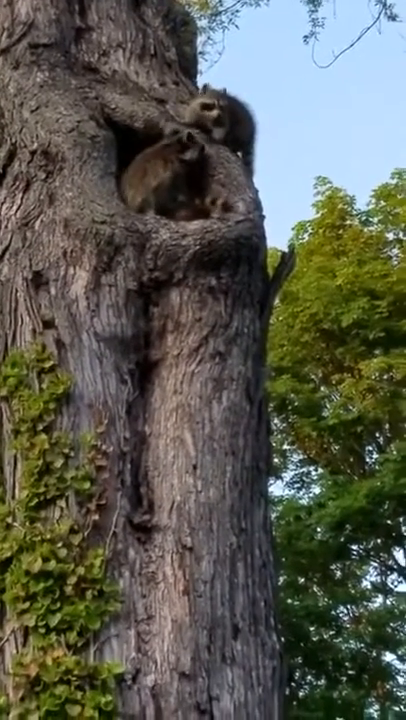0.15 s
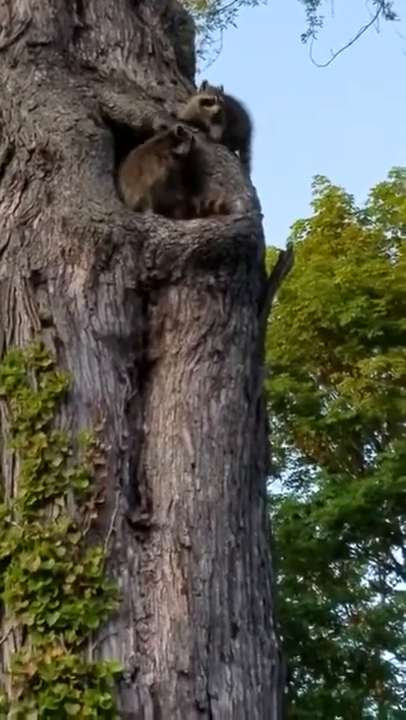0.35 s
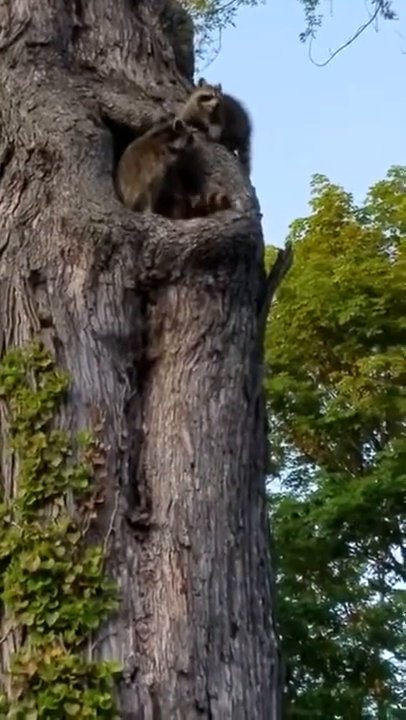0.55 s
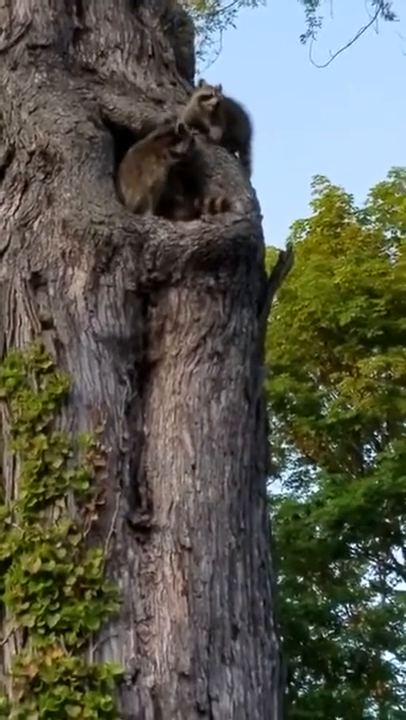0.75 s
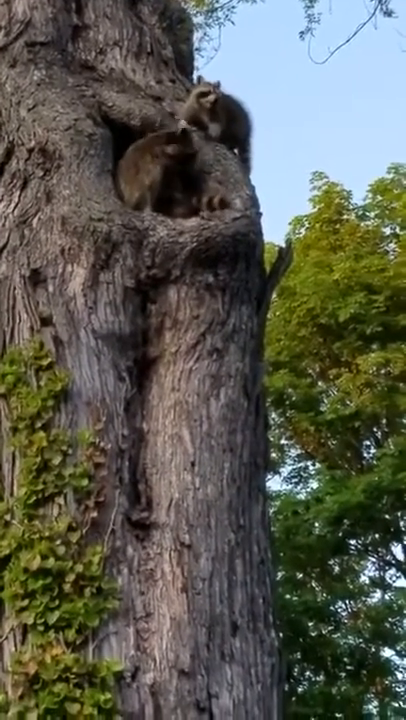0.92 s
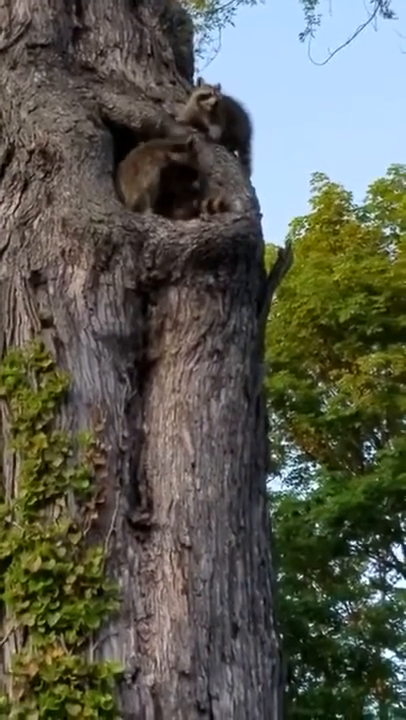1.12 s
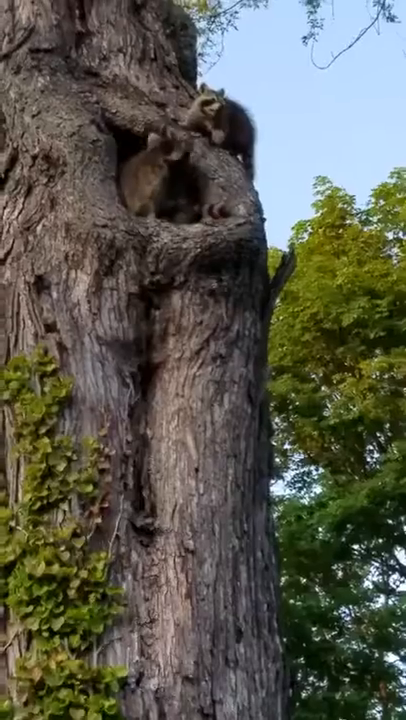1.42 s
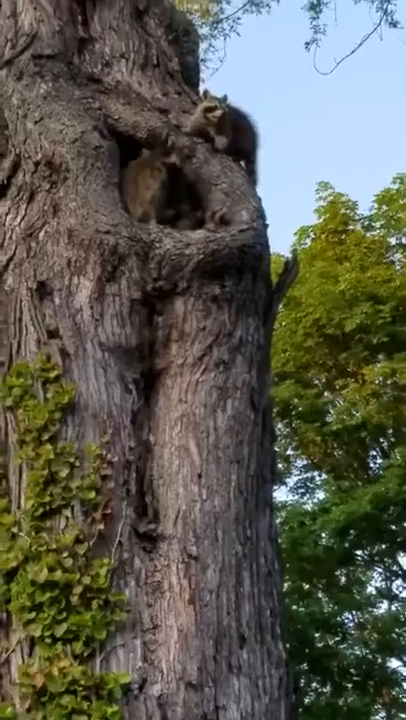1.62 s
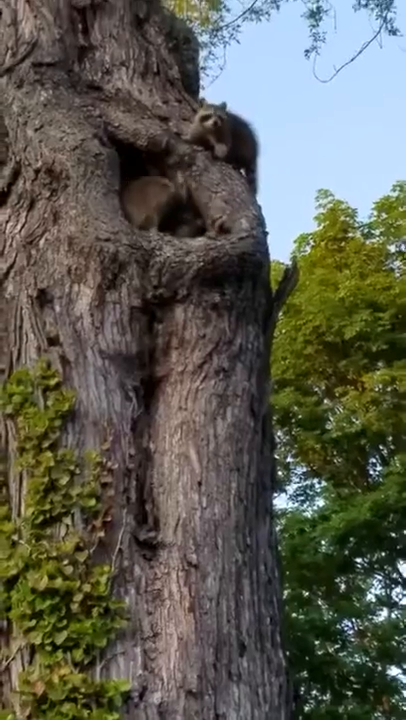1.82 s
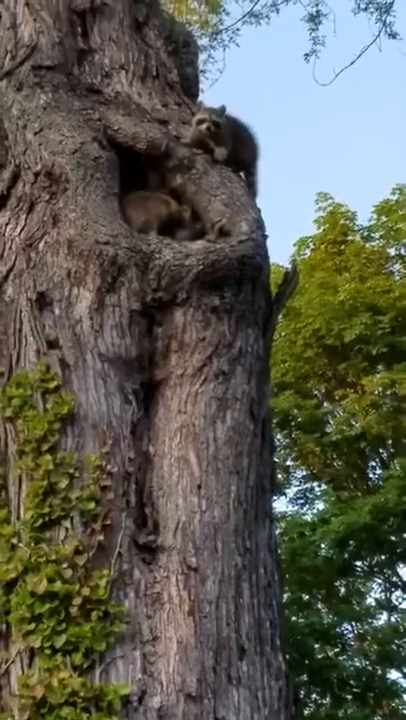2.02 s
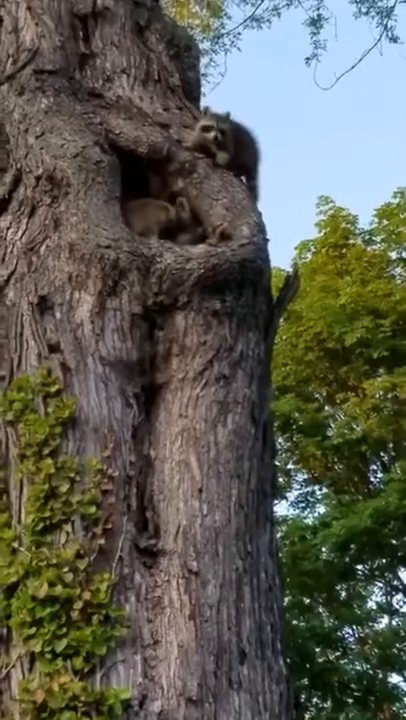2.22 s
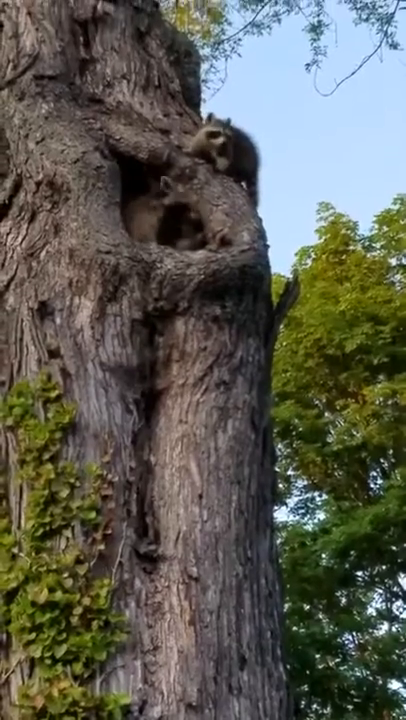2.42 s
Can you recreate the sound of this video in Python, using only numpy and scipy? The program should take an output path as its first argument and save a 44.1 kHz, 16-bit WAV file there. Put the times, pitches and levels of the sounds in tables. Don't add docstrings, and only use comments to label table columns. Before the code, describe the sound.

A rapid raccoon trill, shrill then hoarse, rings through open woods before quiet leaf rustle and traffic hum

```python
import sys
import numpy as np
from scipy import signal
from scipy.fft import rfft, irfft, next_fast_len
from scipy.io import wavfile
from scipy.ndimage import uniform_filter1d

SR = 44100
rng = np.random.default_rng(int(sys.argv[2]) if len(sys.argv) > 2 else 0)


def dump(signal):
    limited = np.clip(np.atleast_2d(signal).T, -1, 1)
    pcm = np.round(limited * 32767).astype(np.int16)
    wavfile.write(sys.argv[1], SR, pcm)


def boost_factor(decibels):
    exponent = np.asarray(decibels, float) / 20
    return 10 ** exponent


N = 112454
PADDED = next_fast_len(N)
FREQ = np.fft.rfftfreq(PADDED, 1 / SR)

# (frequency [Hz], density [dB per Hz])
TRAFFIC_COLOUR = [(15, -60), (25, -49), (59, -8), (204, -2), (552, -10.5), (919, -8.5), (1450, -14.5),
                  (3830, -31), (15500, -61.5)]
# (frequency [Hz], side against mid [dB])
TRAFFIC_SIDE = [(60, -17), (110, -29), (200, -15.5), (380, -9.5), (700, -8), (1290, -2.5), (2380, -0.5),
                (4400, -16), (8120, -1), (15000, 7)]
# (time [s], level [dB])
TRAFFIC_SWELL = [(0, 0), (.7, 1), (1.3, 1), (1.9, -0.5), (2.55, -0.5)]
# (frequency [Hz], width [Hz], level [dB])
ENGINE_HUM = [(184, 146, 0)]
# (time [s], length [s], level [dB])
GUSTS = [
    (0.173, 0.022, 9.5),
    (1.81, 0.016, 6.5),
    (2.04, 0.087, 4.5),
    (2.313, 0.059, 4.5),
    (2.54, 0.019, 0.5),
]
# (time [s], length [s], level [dB], pitch [Hz])
BIRD_CALLS = [
    (1.96, .14, -59, 3750),
    (2.27, .09, -66, 3930),
    (2.53, .03, -60, 3800),
]
# (time [s], level [dB], frequency [Hz], length [s])
BUMPS = [
    (0.164, -37.5, 130, 0.066),
    (1.218, -37.5, 128, .045),
    (1.507, -43, 199.6, 0.026),
    (1.76, -45.5, 196.7, 0.038),
    (1.772, -47, 460, 0.027),
    (1.792, -44, 1740, 0.012),
    (1.72, -46, 140, 0.093),
    (2.01, -54, 1670, .02),
    (2.21, -41, 197, 0.015),
    (2.395, -45, 188, 0.021),
]
# (time [s], level [dB])
FINGER_TICKS = [
    (1.762, -43),
    (1.777, -33),
    (1.787, -43),
    (1.796, -38),
]
# (frequency [Hz], width [Hz], depth [0-1, negative rings])
WOODS_RING = [(1600, 300, .8), (2450, 900, -.5), (3080, 300, .7)]
# (frequency [Hz], level [dB])
WOODS_LEFT = [(1000, -2.5), (1600, -5.5), (2500, -2), (4000, 5.5), (8000, -2), (15000, 1.5)]
# (time of peak [s], level [dB], pitch [Hz])
HIGH_PULSES = [(.219, -41.5, 1440), (.258, -29, 1693), (.305, -23, 1759), (.358, -22.5, 1773),
               (.412, -23, 1757), (.46, -23, 1760), (.508, -19.5, 1793), (.551, -20.5, 1835),
               (.591, -18, 1850), (.648, -22.5, 1897), (.684, -20, 1921), (.733, -22, 1927),
               (.779, -22.5, 1930), (.833, -23.5, 1940), (.887, -22.5, 1980), (.934, -21.5, 1981),
               (.976, -23, 1989), (1.017, -20.5, 1983), (1.075, -26, 1960), (1.108, -24.5, 1958),
               (1.158, -32, 1862), (1.234, -26, 1958), (1.312, -29, 1991), (1.397, -32.5, 1874)]
# (time of peak [s], level [dB], pitch [Hz])
LOW_PULSES = [(.492, -34.5, 1570), (.538, -42, 1570), (.585, -43, 1580), (.63, -30, 1580),
              (.677, -27.5, 1590), (.728, -26, 1610), (.767, -28.5, 1570), (.811, -21.5, 1550),
              (.868, -20, 1605), (.912, -26, 1615), (.957, -32.5, 1590), (1.003, -38, 1600),
              (1.045, -24, 1590), (1.095, -31, 1590), (1.15, -25.5, 1570), (1.184, -25.5, 1580),
              (1.23, -30.5, 1570), (1.29, -27, 1545), (1.339, -32, 1555), (1.368, -30, 1547),
              (1.392, -26, 1626)]
HIGH_ORDERS_DB = [0.5, 0.5, -14, -12, -39, -25, -36, -21]
LOW_ORDERS_DB = [-2, -1.5, -5.5, -6, -10, -42, -17.5, -32]
# (time [s], share that the pitch starts low [0-1])
HIGH_SCOOP = [(0.249, .1), (0.499, 0.079), (.7, .035), (1.1, 0.02396)]
LOW_SCOOP = [(.5, .03), (1.3, .025), (1.389, 0.0518)]
# (time [s], first harmonic against the rest [dB])
HIGH_CHEST = [(.22, 8), (.3, 0.5), (.45, -4), (.6, -7), (.8, -3.5), (.93, 3.5), (1.1, -2.5), (1.25, -11),
              (1.32, -3)]
LOW_CHEST = [(.5, 3.5), (.9, -1.5), (1.3, -0.5), (1.39, 3)]
# (time [s], level [dB])
LATE_ONSET = [(.3, -0.5), (.6, -1), (.95, -7), (1.2, -5.5)]
# (time [s], level against the tone [dB], steady share [0-1])
RASP = [(.19, 2.5, 0), (0.299, -7, 0.3), (.5, -10.5, 0.5), (.7, -3.5, 0.96), (.9, -3.5, 1),
        (1.1, 0.5, 0.93), (1.3, 3.5, 1), (1.4, 3.5, 1)]
# (frequency [Hz], level [dB])
THROAT = [(1150, -18.5), (1450, -0.5), (2400, -2.5), (3300, 0.5), (4600, -6.5), (6500, -4.5),
          (10000, -13.5), (15000, -19)]
# (frequency [Hz], width [Hz], depth [0-1, negative
HOLLOW = [(12350, 1300, 0.65), (1610, 124, -2.18), (3046, 176, -1.37)]
# (frequency [Hz], width [Hz], depth [0-1, negative rings])
DIPS_EARLY = [(4160, 1500, 1), (8030, 1300, 0.79), (10000, 1270, 0.83)]
DIPS_MIDDLE = [(4492, 960, 0.99), (8850, 460, 1)]
DIPS_LATE = [(4810, 590, 0.74), (8750, 270, 0.65), (2520, 380, -0.55), (4220, 160, -0.17)]
# (frequency [Hz], level [dB])
LEFT_PORT = [(1000, -1), (1600, -19), (2000, -4.5), (3000, -9.5), (3800, -1), (5000, -8.5), (8000, -13.5),
             (15000, -12)]
# (frequency [Hz], lag [s])
LEFT_LAG = [(1000, .0001), (1700, .00028), (2300, 0)]
# (from [s], to [s], low edge [Hz], high edge [Hz])
SILENT_BANDS = [(.255, .5, 3870, 4260), (.5, .6, 4050, 4260), (.325, .62, 4260, 4600),
                (.62, .915, 4400, 4620), (.31, .478, 7560, 8230), (.328, .357, 8230, 8750),
                (.455, .522, 8230, 8800), (.54, 1.36, 8620, 8790), (.25, .45, 9450, 9620),
                (.305, .385, 9620, 10300), (.24, .56, 11380, 12180), (.56, .9, 11750, 12180),
                (.98, 1.51, 12180, 12450), (.99, 1.1, 12450, 13050), (1.025, 1.075, 11750, 12180),
                (1.165, 1.235, 12450, 13100), (1.355, 1.405, 12450, 13200), (.865, .9, 14300, 15200),
                (.195, .82, 15200, 16000), (1.05, 1.1, 15200, 16000), (1.145, 1.52, 15200, 16000)]


def walk(rate):
    k = max(int(SR / rate), 2)
    steps = np.repeat(rng.standard_normal(N // k + 1), k)
    w = uniform_filter1d(uniform_filter1d(steps, k), k)[:N]
    return w / w.std()


def level(x, db):
    return x * boost_factor(db) / np.sqrt(np.mean(x ** 2))


def over_time(table, t):
    return np.interp(t, *np.array(table).T)


def over_hz(table):
    hz, v = np.array(table, float).T
    return np.interp(np.log(FREQ + 1), np.log(hz + 1), v)


def shape(x, gain):
    return irfft(rfft(x, PADDED) * gain, PADDED)[..., :N]


def noise(*rows):
    return rng.standard_normal((*rows, N))


def peak(hz, width):
    f = FREQ + 1e-3
    return 1 / (1 + 1j * (f * f - hz * hz) / (f * width))


def dips(table):
    return np.prod([1 - min(depth, .99) * np.abs(peak(hz, w)) ** 4 for hz, w, depth in table], axis=0)


def traffic():
    swell_db, flicker_db = 0.5, 0.8
    colour, side = boost_factor(over_hz(TRAFFIC_COLOUR)), boost_factor(over_hz(TRAFFIC_SIDE))
    width = np.array([np.ones_like(side), side])
    swell, source, out = walk(1.56), noise(2), 0
    for hz in 30 * 2 ** np.arange(0, 9.1, .5):
        band = shape(source, colour * np.abs(peak(hz, hz / 2)) ** 2 * width)
        out = out + band * boost_factor(swell_db * swell + flicker_db * walk(7.8))
    mid, side = level(out, -50) * boost_factor(over_time(TRAFFIC_SWELL, np.arange(N) / SR))
    return np.array([mid + side, mid - side])


def engine_hum():
    out = 0
    for hz, width, db in ENGINE_HUM:
        tone = shape(noise(), peak(hz, width) ** 2 / np.sqrt(width))
        out = out + boost_factor(db + 5.1 * walk(8.83)) * tone
    return level(out, -53.5)


def leaves():
    t = np.arange(N) / SR
    rustle = level(shape(noise(2), peak(3450, 1860) ** 2) * boost_factor(2.4 * walk(3.08)), -60)
    gust_db = sum(db * np.exp(-.5 * ((t - at) / length) ** 2) for at, length, db in GUSTS)
    return rustle * boost_factor(gust_db)


def rumble():
    t, from_s, to_s = np.arange(N) / SR, 0.31, 2.13
    on = np.clip(np.minimum(t - from_s, to_s - t) / 0.074, 0, 1)
    return on * level(shape(noise(), peak(71.3, 12) ** 2), -58.5)


def hiss():
    from_hz = 7900
    return level(shape(noise(2), over_hz([(from_hz / 2, 0), (from_hz, 1)])), -71)


def background():
    bed = traffic() + engine_hum() + leaves() + rumble() + hiss()
    return bed * boost_factor(np.array([[-3], [0]]))


def whine():
    return boost_factor(-78) * np.sin(2 * np.pi * 15723 * np.arange(N) / SR)


def far_bird():
    t, out = np.arange(N) / SR, 0
    for at, length, db, hz in BIRD_CALLS:
        hoarse = level(shape(noise(2), peak(hz, 250) ** 2), db)
        out = out + hoarse * np.sin(np.pi * np.clip((t - at) / length, 0, 1))
    return out


def hand():
    t, out, tick_s = np.arange(N) / SR, 0, .0007
    for at, db, hz, length in BUMPS:
        u = np.clip((t - at) / length, 0, 1)
        swing = np.sin(2 * np.pi * hz * (t - at) * (1 - 0.045 * u))
        out = out + boost_factor(db) * np.sin(np.pi * u ** 0.7) * swing
    for at, db in FINGER_TICKS:
        out = out + boost_factor(db) * np.exp(-np.abs(t - at) / tick_s) * np.cos((t - at) / tick_s)
    return out


def woods(x):
    t60_s, top_t60_s, tail_db = 0.52, 0.23, -3.5
    early_s, early_db = .008, -3
    t = np.arange(SR) / SR
    out = []
    for _ in range(2):
        low_source, top_source, near_source = rng.standard_normal((3, SR))
        low = signal.lfilter([.4], [1, -.6], low_source)
        top = top_source - signal.lfilter([.4], [1, -.6], top_source)
        tail = low * boost_factor(-60 * t / t60_s) + top * boost_factor(-60 * t / top_t60_s)
        tail = shape(tail, dips(WOODS_RING))[:SR]
        near = near_source ** 3 * np.exp(-t / early_s) * (t > .001)
        ir = boost_factor(tail_db) * tail * np.clip(t / 0.014, 0, 1) / np.sqrt(np.sum(tail ** 2))
        ir = ir + boost_factor(early_db) * near / np.sqrt(np.sum(near ** 2))
        out.append(signal.fftconvolve(x, ir)[:N])
    return np.array([shape(out[0], boost_factor(over_hz(WOODS_LEFT))), out[1]])


def voice(pulses, orders_db, scoop, chest):
    rise_s, fall_s, edge_s, onset_db = .022, 0.00813, 0.0024, -8
    overshoot, brighten_db = .012, -6
    t = np.arange(N) / SR
    at, db, hz = np.array(pulses).T
    d = t - at[:, None]

    start_db = (onset_db + over_time(LATE_ONSET, at))[:, None]
    swell = boost_factor(start_db * np.clip(-d / rise_s, 0, 1) ** 2) * np.clip((d + rise_s) / edge_s, 0, 1)
    each = boost_factor(db)[:, None] * swell * np.exp(-.5 * (np.maximum(d, 0) / fall_s) ** 2)
    flow = each.sum(axis=0)

    k = each.argmax(axis=0)
    u = np.clip((t - at[k]) / rise_s, -1, 1)
    bend = np.where(u < 0, -over_time(scoop, at)[k] * np.abs(u) ** 1.5, overshoot * u)
    pitch = uniform_filter1d(hz[k] * (1 + bend), size=60)
    phase = 2 * np.pi * np.cumsum(pitch * (1 + .0095 * walk(300))) / SR

    tone = 0
    for n, order_db in enumerate(orders_db):
        gain_db = order_db + n * brighten_db * np.minimum(u, 0) ** 2 + 2.2 * walk(220)
        if n == 0:
            gain_db = gain_db + over_time(chest, t)
        tone = tone + boost_factor(gain_db) * np.sin((n + 1) * phase)
    tremble = boost_factor(1.8 * walk(120))
    return flow * tone * tremble, flow, phase


def breath_rasp(flow, high_phase, low_phase):
    t, end_s = np.arange(N) / SR, 1.415
    s, db, steady = np.array(RASP).T
    share = np.clip(np.interp(t, s, steady), 0, 1)
    held = uniform_filter1d(flow, size=2600) * np.clip((end_s - t) / 0.015, 0, 1)
    air = (1 - share) * flow + share * held
    puffs = noise() * (1 + .5 * np.cos(high_phase) + .5 * np.cos(low_phase)) * boost_factor(1.23 * walk(180))
    throat = boost_factor(over_hz(THROAT)) * over_hz([(900, 0.018), (1200, 1)])
    return level(shape(puffs, throat), 0) * air * boost_factor(np.interp(t, s, db))


def raccoons():
    high, high_flow, high_phase = voice(HIGH_PULSES, HIGH_ORDERS_DB, HIGH_SCOOP, HIGH_CHEST)
    low, low_flow, low_phase = voice(LOW_PULSES, LOW_ORDERS_DB, LOW_SCOOP, LOW_CHEST)
    rasp = breath_rasp(np.hypot(high_flow, low_flow), high_phase, low_phase)
    call = shape(np.array([high, low, rasp]), dips(HOLLOW))
    t, out = np.arange(N) / SR, 0
    for dip_table, on in zip((DIPS_EARLY, DIPS_MIDDLE, DIPS_LATE), np.eye(3)):
        share = np.interp(t, [0.42, 0.8, 1.3], on)
        out = out + shape(call * share, dips(dip_table))
    return out


def scene():
    high, low, rasp = raccoons()
    call = high + low + rasp
    lag = np.exp(-2j * np.pi * FREQ * over_hz(LEFT_LAG))
    left = shape(call, boost_factor(over_hz(LEFT_PORT)) * lag)
    echoes = boost_factor(-6) * (woods(high) + woods(low)) + woods(rasp)
    return np.array([left, call]) + echoes + background() + hand() + whine() + far_bird()


def silence_bands(x):
    out, edge_s = x.copy(), .016
    for start, end, low_hz, high_hz in SILENT_BANDS:
        a, b = int((start - 2 * edge_s) * SR), int((end + 2 * edge_s) * SR)
        t, size = np.arange(a, b) / SR, next_fast_len(b - a)
        f = np.fft.rfftfreq(size, 1 / SR)
        in_band = (f >= low_hz) & (f < high_hz)
        off = np.sin(np.pi / 2 * np.clip(np.minimum(t - start, end - t) / edge_s + .5, 0, 1))
        spectrum = rfft(out[:, a:b] * np.minimum(4 * off, 1), size)
        out[:, a:b] -= off * irfft(spectrum * in_band, size)[:, :b - a]
    return out


def top_cut(x):
    return signal.sosfilt(signal.butter(12, 15730, fs=SR, output="sos"), x)


def record(dry):
    mix = silence_bands(shape(dry, FREQ < 15780))
    return top_cut(mix)


dry = scene()
out = record(dry)
dump(out)
```